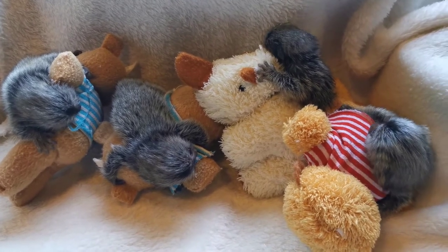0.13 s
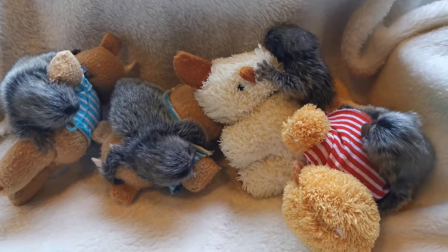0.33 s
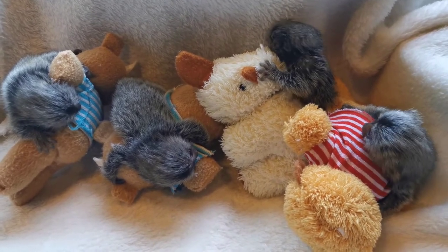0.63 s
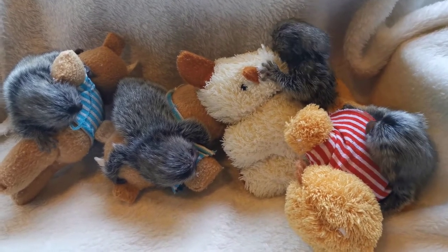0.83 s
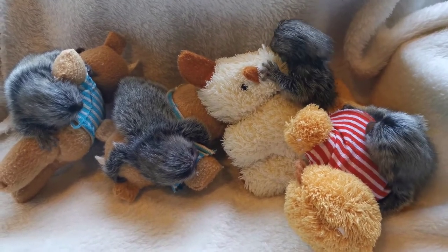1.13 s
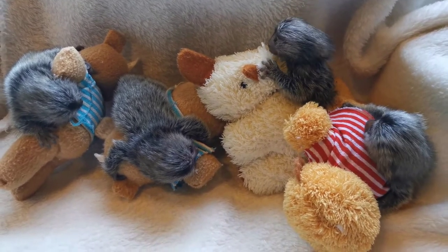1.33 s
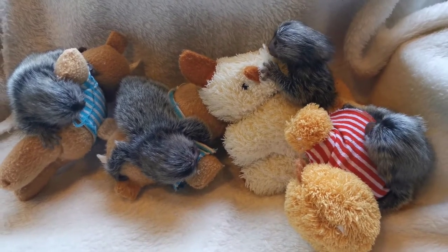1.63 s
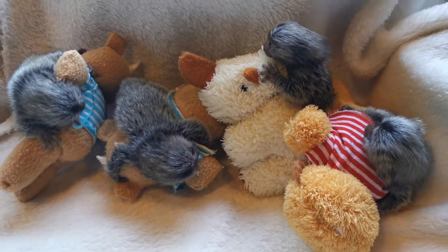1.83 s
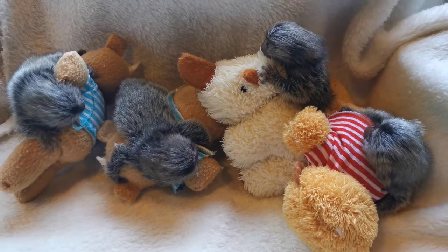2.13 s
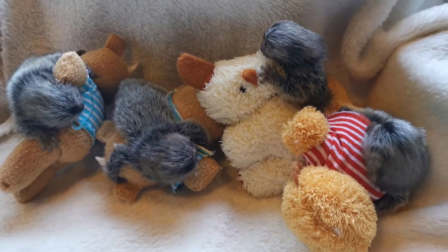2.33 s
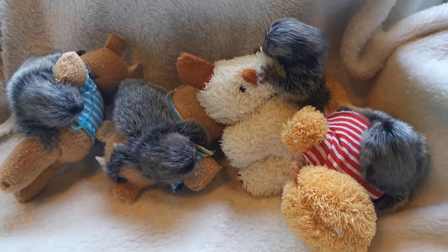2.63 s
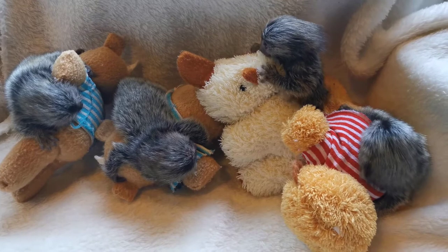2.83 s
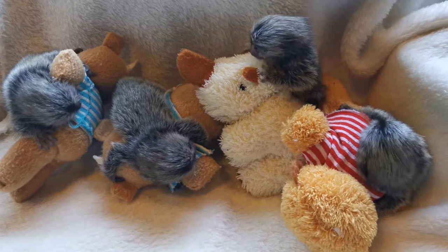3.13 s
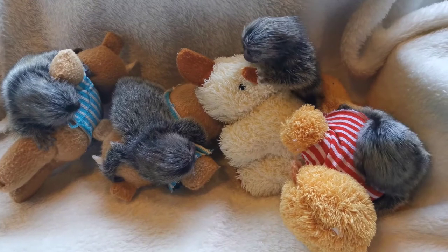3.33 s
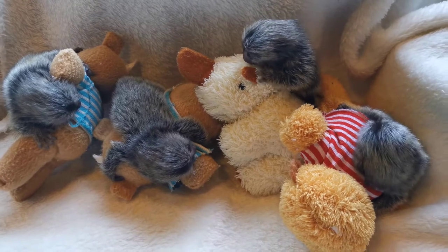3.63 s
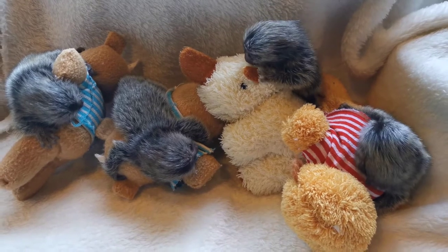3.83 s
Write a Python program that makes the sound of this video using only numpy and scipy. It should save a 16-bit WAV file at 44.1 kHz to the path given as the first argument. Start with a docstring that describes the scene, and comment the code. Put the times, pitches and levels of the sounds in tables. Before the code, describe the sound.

Tiny monkeys give very high, sharp chirps and a raspy screech in a small echoing room.

```python
"""Baby marmosets cling to plush toys in a small, hard-walled room, close to the microphone.
First a hoarse cry of air dies away, then chirps made of gliding tones arch and dive one after another.
Plush, made of shaped noise, rustles in the middle, and thin wavering tones whistle near the last of the run.
A screech of throat pulses and air follows; two late chirps, more whistles and rustles come after.
A faint mains hum, hiss and room rumble run throughout; a faint hollow tone comes and goes early on."""
import sys
import numpy as np
from scipy import signal
from scipy.fft import rfft, irfft, next_fast_len
from scipy.io import wavfile
from scipy.ndimage import uniform_filter1d, map_coordinates

SR = 44100
rng = np.random.default_rng(int(sys.argv[2]) if len(sys.argv) > 2 else 0)


def put_to_file(sound):
    """Save the sound as 16-bit audio at rate SR, in the file named by the first command-line argument."""
    columns = np.atleast_2d(sound).T  # one column per channel
    safe = np.clip(columns, -1, 1)
    whole_steps = np.round(safe * 32767)
    wavfile.write(sys.argv[1], SR, whole_steps.astype(np.int16))


N = 176400  # samples, 4 seconds
TOP_HZ = 15750  # nothing is kept above this


def amp(db):
    """Turn decibels into a gain."""
    return 10 ** (np.asarray(db) / 20)


def unit(x):
    """Scale x to an average strength (rms) of 1."""
    return x / np.sqrt(np.mean(x ** 2) + 1e-20)


def along(points, hz):
    """Read a curve of (Hz, value) points on a logarithmic frequency axis."""
    point_hz, values = np.transpose(points)
    return np.interp(np.log(hz + 1), np.log(point_hz + 1), values)


def clock():
    """Time of each sample in seconds."""
    return np.arange(N) / SR


def curves(rows):
    """Join rows into one smooth-running curve for each column after the time."""
    times, *columns = np.transpose(rows)
    return [np.interp(clock(), times, column) for column in columns]


def wobble(rate, size=N):
    """A smooth random curve through `rate` random points a second."""
    knots = rng.standard_normal(size // 4 + 8)
    return map_coordinates(knots, [np.arange(size) * rate / SR], mode="wrap")


def filtered(x, response):
    """Multiply the spectrum of x by a response that depends on frequency."""
    size = x.shape[-1]
    padded = next_fast_len(size + 8192)
    spectrum = rfft(x, padded) * response(np.fft.rfftfreq(padded, 1 / SR))
    return irfft(spectrum, padded)[..., :size]


def coloured(x, spectrum):
    """Shape x by (Hz, dB) points and bring it to rms 1."""
    return unit(filtered(x, lambda hz: amp(along(spectrum, hz))))


def pan(db):
    """Left and right gains; a positive difference is louder on the left."""
    return amp(np.array([[db], [-db]]) / 2)


def rush(spectrum):
    """Stereo noise at rms 1, alike on both sides in the bass and nearly unrelated in the treble."""
    # How alike left and right are. Each row: frequency in Hz, likeness from 0 to 1.
    likeness = [(60, 0.9), (250, 0.92), (600, 0.54), (1500, 0), (8000, 0.056)]

    def mid_and_side(hz):
        turn = np.arccos(np.clip(along(likeness, hz), -1, 1)) / 2
        return amp(along(spectrum, hz)) * [np.cos(turn), np.sin(turn)]

    mid, side = filtered(rng.standard_normal((2, N)), mid_and_side)
    return unit(np.array([mid + side, mid - side]))


def swells(rows):
    """Add up loudness shapes that rise, hold and fall, each with slightly rounded slopes."""
    total = 0
    for start, attack, hold, release, db in rows:
        corners = np.cumsum([start, attack, hold, release])
        total = total + amp(db) * np.interp(clock(), corners, [0, 1, 1, 0]) ** 0.77
    return total


def add(out, start_s, x):
    """Mix x into out from a start time."""
    part = out[:, max(round(start_s * SR), 0):][:, :x.shape[1]]
    part += x[:, :part.shape[1]]


def patchy(x, depth_db):
    """Give x random swells about 200 Hz wide and a tenth of a second long, then bring it to rms 1."""
    z = signal.stft(x, nperseg=1024)[2]
    field = rng.standard_normal(z.shape[1:])
    field = uniform_filter1d(field, size=5, axis=0)  # across frequency
    field = uniform_filter1d(field, size=8, axis=1)  # across time
    return unit(signal.istft(z * amp(depth_db * unit(field)), nperseg=1024)[1][:, :N])


def at_ports(x):
    """The straight path to two microphone ports, reaching the right one a little later."""
    # Tone of the straight path. Each row: frequency in Hz, gain in dB.
    direct = [(3000, -6.5), (6300, -15), (8500, -7.5), (11000, -4), (13000, -15), (15000, -7)]
    lag_s = 0.000157

    def path(hz):
        shift = np.exp(1j * np.pi * np.outer([1, -1], hz) * lag_s)  # half the lag each way
        return amp(along(direct, hz)) * shift

    return filtered(x, path)


def in_room(x, room_db, pan_db):
    """Straight sound plus strong near walls and a dying tail, drawn anew for each call."""
    # How long echoes last. Each row: frequency in Hz, time to fall by 60 dB in seconds.
    decay = [(300, 1), (3000, 0.65), (6500, 0.6), (10000, 0.4), (15000, 0.33)]
    # Tone of the walls. Each row: frequency in Hz, gain in dB.
    wall_tone = [(2000, 0.5), (4200, 4), (6300, 8), (8000, -5), (9500, 2), (12500, 1.5), (15000, -4.5)]
    # Side the echoes lean to. Each row: frequency in Hz, left minus right in dB.
    wall_lean = [(600, -6), (2400, -7), (4400, -1), (6300, 0), (9500, -2.5), (13000, -7.5)]
    early_db, early_s, first_wall_s = 6, 0.0099, 0.0014  # early boost, its fading time, first echo
    hz, t, z = signal.stft(rng.standard_normal((2, SR // 2)), SR, nperseg=256)
    fading = amp(-60 * t / along(decay, hz)[:, None])
    tail = signal.istft(z * fading, SR, nperseg=256)[1]
    t = np.arange(tail.shape[1]) / SR
    tail = tail * amp(early_db * np.exp(-t / early_s)) * np.clip(t / first_wall_s - 1, 0, 1)
    walls = lambda hz: amp(along(wall_tone, hz) + np.outer([.5, -.5], along(wall_lean, hz)))
    tail = filtered(tail / np.linalg.norm(tail[0]), walls)
    out = signal.fftconvolve(x[None], tail, axes=1) * amp(room_db)
    out[:, :len(x)] += at_ports(x) * pan(pan_db)
    return out


def chirps():
    """Each chirp holds a note, arches up and dives; the voice grows unsteady and breathy as it falls."""
    # Each row: start in seconds, attack, time to the crest, rise time and dive time in seconds,
    # start, crest and end pitch in Hz, level before mouth and room in dB, change of level by the
    # dive's end in dB, roughness from 0 to 1, room gain in dB, left minus right in dB.
    calls = [ (0.294, 0.005, 0.026, .014, 0.032, 9420, 10020, 5710, -23.5, -17.5, 0.13, -3, -14.5),
             (.450, 0.0034, .028, 0.023, 0.02, 8890, 10010, 5120, -24.5, -14, 0.05, -0.5, -17.5),
             (.591, 0.0052, 0.022, 0.019, .017, 8820, 10610, 5330, -24.5, -13, 0.3, -2, -10),
             (.746, 0.0022, 0.029, .014, 0.019, 8860, 9070, 5870, -27.5, -13.5, 0, -1, 12.5),
             (0.905, 0.0059, 0.039, 0.012, 0.011, 9195, 10010, 7100, -27.5, -27, 0.25, -5, -17),
             (1.072, .003, 0.045, 0.04, 0.0088, 9000, 10920, 7800, -28.5, -21, 0, -3.5, -13.5),
             (1.238, 0.024, 0.041, 0.055, 0.012, 7970, 9810, 6230, -29, -14.5, .15, -3, 16.5),
             (1.384, 0.0038, .025, 0.029, .023, 8570, 10610, 4655, -26.5, -5.5, 0.3, -5.5, -9.5),
             (1.578, 0.0018, 0.018, 0.015, 0.019, 9630, 10690, 5696, -27, -7, 0.5, -3, -8.5),
             (1.739, 0.0051, 0.031, 0.017, 0.017, 8890, 9720, 5650, -34.5, -13.5, 0.2, 4, 17.5),
             (1.886, 0.0057, 0.017, 0.024, 0.02, 8500, 9630, 5325, -32, -11, 0.25, 2, 17.5),
             (2.017, 0.022, 0.022, 0.0085, .036, 7950, 8050, 5100, -38.5, -7.5, 0.23, 5.5, 24),
             (2.140, 0.021, .016, 0.015, .036, 7450, 7590, 5140, -33.5, -10, 0, -2, 21),
             (2.300, 0.0046, 0.0026, 0.03, 0.032, 7350, 7260, 5190, -34.5, -11.5, 0, 0, -5),
             (2.411, 0.017, 0.019, 0.016, 0.038, 7770, 7910, 4930, -38.5, -6.5, 0, 4.5, 11),
             (3.447, .012, .035, 0.0144, .019, 9480, 9750, 5730, -40, -13, 0.06, 7.5, -12),
             (3.936, 0.0091, .019, 0.023, 0.024, 9620, 9530, 5620, -36.5, -4, 0.27, 5.5, 8)]
    # Tone of the breath. Each row: frequency in Hz, gain in dB.
    breath = [(1500, 12), (2600, 0), (4200, 11.5), (6200, 22.5), (8000, 20.5), (10500, 10.5), (12500, 21),
              (14500, -64)]
    # Tone of the mouth. Each row: frequency in Hz, gain in dB.
    mouth = [(1500, -19.5), (3000, -11), (12000, -1.5), (13200, -1), (14500, -34), (15700, -20)]
    lead_db, lead_per_khz_db = 1.5, 0.5  # the lead-in is lifted, the more so the lower it starts
    overtone_db, hiss_db, hiss_grows_db = -2.5, -26.5, 32.5  # overtone and hiss grow in the dive
    flutter_hz, flutter_uneven, flutter_depth = 850, .3, 1.3  # depth in radians at roughness 1
    dive_bend, release_s = 1.6, 0.0022  # curve of the dive, closing edge
    waver, dive_waver, dive_shake_db = .003, .017, 3  # wavers as a share of the pitch
    out, t = np.zeros((2, N)), np.arange(SR // 10) / SR
    size = len(t)
    for (start, attack_s, crest_s, rise_s, dive_s, start_hz, crest_hz, end_hz,
         db, dive_db, rough, room_db, pan_db) in calls:
        arch = np.sin(np.pi / 2 * np.clip((t - crest_s) / rise_s + 1, 0, 1)) ** 2
        dive = np.clip((t - crest_s) / dive_s, 0, 1) ** dive_bend
        hz = start_hz + (crest_hz - start_hz) * arch + (end_hz - crest_hz) * dive
        hz = hz * (1 + (waver + dive_waver * dive) * wobble(900, size=size))
        uneven_hz = flutter_hz * (1 + flutter_uneven * wobble(907, size=size))
        flutter = np.sin(2 * np.pi * np.cumsum(uneven_hz) / SR)
        flutter = rough * flutter_depth * np.sqrt(arch) * (1 - dive) * flutter
        phase = 2 * np.pi * np.cumsum(hz) / SR + flutter
        below_top = np.clip((TOP_HZ - 2 * hz) / 2500, 0, 1)  # fades the overtone near the limit
        overtone = amp(overtone_db) * np.sin(2 * phase) * below_top
        voice = np.sin(phase) + dive * overtone
        hiss = coloured(rng.standard_normal(size), breath)
        hiss = amp(hiss_db + hiss_grows_db * np.sqrt(dive)) * hiss
        edges = np.clip(np.minimum(t / attack_s, (crest_s + dive_s - t) / release_s), 0, 1)
        lift_db = lead_db + lead_per_khz_db * (crest_hz - start_hz) / 1000
        change_db = dive * (dive_db + dive_shake_db * wobble(595, size=size))
        level = amp(db + lift_db * (1 - arch) + change_db) * edges
        call = filtered(level * (np.sqrt(2) * voice + hiss), lambda hz: amp(along(mouth, hz)))
        add(out, start, in_room(call, room_db, pan_db))
    return out


def shrills():
    """A second, unsteady voice, one wavering tone, breaks in above some of the early chirps."""
    # Each row: start in seconds, length in seconds, start and end pitch in Hz, level before room in dB.
    notes = [(.611, 0.022, 11000, 11100, -27.5), (.931, 0.025, 11000, 11700, -30.5),
             (1.081, 0.013, 10500, 11200, -26.5), (1.100, 0.022, 11650, 11750, -21.5),
             (1.250, 0.0098, 10800, 10640, -27.5), (1.266, 0.028, 10700, 10870, -33),
             (1.400, 0.025, 10900, 10720, -25.5), (1.591, 0.023, 11200, 11270, -25)]
    waver, rate_hz, shake_db, edge_s = .032, 900, 3, .003  # waver as a share of the pitch
    out, t = np.zeros((2, N)), np.arange(SR // 20) / SR
    for start, length, start_hz, end_hz, db in notes:
        hz = np.interp(t, [0, length], [start_hz, end_hz])
        hz = hz * (1 + waver * np.tanh(wobble(rate_hz, size=len(t))))
        edges = np.clip(np.minimum(t, length - t) / edge_s, 0, 1)
        level = amp(db + shake_db * wobble(rate_hz, size=len(t))) * edges
        note = level * np.sin(2 * np.pi * np.cumsum(hz) / SR)
        add(out, start, in_room(note, room_db=-9, pan_db=-11.5))
    return out


def rasps():
    """The cry and some chirps break into short hoarse bursts of shaped noise."""
    # Each row: start in seconds, attack, hold and release in seconds, level before room in dB.
    bursts = [(.175, 0.011, 0.033, 0.056, -57.5), (.475, 0.017, 0.016, 0.039, -54),
              (.605, 0.0054, 0.018, 0.035, -45), (1.41, 0.011, 0.0054, 0.015, -56),
              (2.055, 0.0068, 0.0037, 0.0082, -55), (2.165, 0.0046, 0.016, 0.023, -48.5),
              (2.44, 0.0088, 0.015, 0.017, -62), (3.962, 0.0051, 0.017, .02, -51.5)]
    # Tone of the bursts. Each row: frequency in Hz, gain in dB.
    burst_tone = [(1700, -18), (2400, -2), (3300, 1), (4500, 0.5), (6200, 2), (8000, -7.5), (14000, -9)]
    air = swells(bursts) * coloured(rng.standard_normal(N), burst_tone)
    return in_room(air, room_db=0.5, pan_db=1)[:, :N]


def whistles():
    """Thin wavering notes that bend through a middle pitch, heard mostly by way of the walls."""
    # Each row: start in seconds, length in seconds, start, middle and end pitch in Hz,
    # level before room in dB, roughness where 1 is the full waver.
    notes = [(2.098, 0.1, 8000, 8490, 8070, -46, 0.1), (2.217, 0.17, 8510, 8200, 8000, -44, 0.23),
             (3.378, 0.075, 8480, 8600, 8600, -57.5, 0.4), (3.708, 0.14, 9680, 9350, 9300, -54, 1.1),
             (3.727, 0.22, 8580, 9020, 8700, -56.5, 0.57), (3.79, .11, 9300, 9770, 9570, -55.5, 1.15)]
    waver, rate_hz, edge_s, flutter = .011, 220, .02, .55  # share of pitch, Hz, seconds, radians
    out, t = np.zeros((2, N)), np.arange(SR // 3) / SR
    for start, length, start_hz, middle_hz, end_hz, db, rough in notes:
        u = np.clip(2 * t / length - 1, -1, 1)  # -1 at the start, 0 in the middle, 1 at the end
        hz = middle_hz + (np.where(u < 0, start_hz, end_hz) - middle_hz) * u ** 2
        hz = hz * (1 + rough * waver * wobble(rate_hz, size=len(t)))
        edges = np.clip(np.minimum(t, length - t) / edge_s, 0, 1)
        phase = 2 * np.pi * np.cumsum(hz) / SR + rough * flutter * wobble(990, size=len(t))
        add(out, start, in_room(amp(db) * edges * np.sin(phase), room_db=7.0, pan_db=11))
    return out


def buzz(pitch, air_share):
    """Uneven throat pulses mixed with air that swells once a cycle."""
    jitter, scatter_s, pulse_db = .0035, .000008, 1.4  # share of pitch, timing scatter, level scatter
    cycles = np.cumsum(pitch * (1 + jitter * wobble(90))) / SR + scatter_s * pitch * wobble(600)
    harmonics = sum(np.cos(2 * np.pi * k * cycles) for k in np.arange(1, 28))
    pulses = unit(harmonics * amp(pulse_db * wobble(500)))
    air = unit(rng.standard_normal(N) * (1 + 0.67 * np.cos(2 * np.pi * cycles)))
    share = np.clip(air_share, 0, 1)
    return np.sqrt(1 - share) * pulses + np.sqrt(share) * air


def screech():
    """A harsh buzz that clears from air into a pitch while the throat opens, then tires."""
    # Each row: time in seconds, pitch in Hz, level before room in dB.
    course = [(2.56, 537, -52.5), (2.605, 528.7, -36.5), (2.635, 558, -35), (2.70, 570.7, -33.5),
              (2.75, 574, -33.5), (2.83, 578.2, -33), (2.89, 579.8, -35.5), (2.97, 585.2, -37),
              (3.05, 576.4, -40), (3.09, 581, -43), (3.14, 564.3, -43.5), (3.185, 581, -42.5),
              (3.23, 568, -56), (3.29, 554, -79)]
    # Each row: time in seconds, share of air from 0 to 1.
    breathiness = [(2.6, .85), (2.65, .65), (2.70, .08), (2.83, .08), (2.9, .02), (3.06, .02), (3.14, .2),
                   (3.19, .7)]
    # Tone of the throat at the start, at full effort and as it tires.
    # Each row: frequency in Hz, gain in dB.
    throat_tight = [(600, -29), (1700, -24.5), (2300, -6), (3400, -6.5), (4200, -15.5), (5800, -10.5),
                    (8000, -8), (9200, 3.5), (10500, -10.5), (12400, -5), (14400, -31)]
    throat_open = [(530, -39), (1150, -12.5), (1600, -18.5), (2300, -8), (3450, -18), (4300, -23),
                   (5200, -10), (6100, -2), (7600, -10), (9800, 2), (11000, 5), (12700, 1.5), (14400, -9)]
    throat_late = [(290, -44), (570, -14), (1150, -16), (1730, -6.5), (2300, 0), (2900, -8.5),
                   (4400, -11.5), (5300, -22.5), (6600, 2.5), (7800, -0.5), (10500, -6.5), (13300, -0.5),
                   (15500, -4)]
    # When the throat opens and when it tires: start and end in seconds.
    opening_s = (2.64, 2.743)
    tiring_s = (2.726, 3.1)
    pitch, db = curves(course)
    air_share, = curves(breathiness)
    source = patchy(buzz(pitch, air_share)[None], depth_db=2.5)[0]
    opened = np.interp(clock(), opening_s, [0, 1])
    tired = np.interp(clock(), tiring_s, [0, 1])
    fresh = (1 - opened) * coloured(source, throat_tight) + opened * coloured(source, throat_open)
    voice = (1 - tired) * fresh + tired * coloured(source, throat_late)
    sounding = (clock() > course[0][0]) & (clock() < course[-1][0])
    return in_room(voice * sounding * amp(db + 1.95 * wobble(70)), room_db=-2, pan_db=0)[:, :N]


def hoarse_cry():
    """The end of a screech that is nearly all air, pulsing at 590 Hz."""
    # Each row: time in seconds, level before room in dB.
    fading = [(0, -36.5), (.1, -47.5), (.135, -49), (.165, -53), (.2, -53), (.24, -80), (.29, -100)]
    # Tone of the cry. Each row: frequency in Hz, gain in dB.
    cry_tone = [(880, -42.5), (1500, -32.5), (2440, -20.5), (3580, -32.5), (4500, -43), (5500, -30.5),
                (6750, -12.5), (7900, -11.5), (9300, -4.5), (11000, -12.5), (12400, -9), (15500, -14.5)]
    db, = curves(fading)
    voice = coloured(buzz(np.full(N, 590), air_share=0.99), cry_tone)
    return in_room(voice * amp(db + 1.0 * wobble(96)), room_db=6.0, pan_db=-24)[:, :N]


def fabric():
    """Plush rubs and gives softly as the animals shift: patchy noise, and soft bumps of the bedding."""
    # Each row: start in seconds, attack, hold and release in seconds,
    # level before panning and dulling in dB, upper edge in Hz.
    rustles = [(1.484, 0.15, 0.45, 0.27, -52.5, 2400), (2.852, 0.024, 0.024, 0.24, -43.5, 3480),
               (3.264, 0.045, 0.011, 0.063, -47.5, 4830), (3.328, 0.052, 0.03, 0.3, -55.5, 4550),
               (3.768, 0.086, 0.29, 0.056, -56, 5300)]
    # Tone of the plush. Each row: frequency in Hz, gain in dB.
    plush = [(150, -8), (450, -2.5), (800, -4.5), (1200, 0.5), (1600, -3.5), (2200, 9), (2800, -3.5),
             (4000, -3), (6500, -7), (15000, -60)]
    # Each row: start in seconds, attack, hold and release in seconds, level in dB.
    bumps = [(1.19, 0.01, .01, 0.038, -59), (3.08, 0.036, 0.074, 0.19, -53), (3.8, 0.13, 0.052, 0.073, -49)]
    # Tone of the bedding. Each row: frequency in Hz, gain in dB.
    bedding = [(40, -15), (120, -1), (280, -5), (450, -19.5), (1500, -26)]
    nap = amp(0.91 * wobble(60)) * patchy(rush(plush), depth_db=2.5) * pan(db=-11)
    rub = np.zeros((2, N))
    for *shape, top_hz in rustles:
        rub += filtered(swells([shape]) * nap, lambda hz: 1 / np.sqrt(1 + (hz / top_hz) ** 10))
    return rub + swells(bumps) * rush(bedding)


def room_tone():
    """Rumble and hiss of shaped noise, a steady mains hum and a faint hollow tone of narrow noise."""
    # Tone of the rumble, the hiss and the hollow tone. Each row: frequency in Hz, gain in dB.
    rumble_tone = [(15, -49), (25, -3.5), (44, 0.5), (70, 2.5), (92, -4.5), (125, -3), (253, -1.5),
                   (338, -9.5), (425, -10), (616, -11.5), (758, -10.5), (858, -15.5), (1530, -14.5),
                   (3500, -18.5), (4550, -84), (7700, -120)]
    hiss_tone = [(1500, -45), (3500, 1), (6000, 1), (11000, 3), (15000, -33)]
    hollow_tone = [(600, -34), (730, 11), (790, 3), (950, -46)]
    # The hollow tone. Each row: start in seconds, attack, hold and release in seconds, level in dB.
    hollow_times = [(-.05, 0.074, 0.1, 0.15, -62), (.77, 0.023, 0.13, 0.2, -66.5)]
    rumble_db, hiss_db, hum_hz, hum_db = -59, -70, 100.2, -66
    hum = amp(hum_db + wobble(1.67)) * np.sqrt(2) * np.sin(2 * np.pi * hum_hz * clock())
    hollow = swells(hollow_times) * rush(hollow_tone)
    rumble = amp(rumble_db + 0.26 * wobble(7.13)) * rush(rumble_tone)
    return rumble + amp(hiss_db) * rush(hiss_tone) + hum + hollow


def scene():
    """All sources together."""
    calls = chirps() + shrills() + rasps() + whistles() + screech() + hoarse_cry()
    return calls + fabric() + room_tone()


def record(dry):
    """The recorder keeps nothing above its band limit."""
    return filtered(dry, lambda hz: hz < TOP_HZ)


dry = scene()
out = record(dry)
put_to_file(out)
```